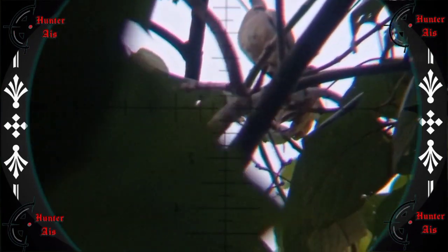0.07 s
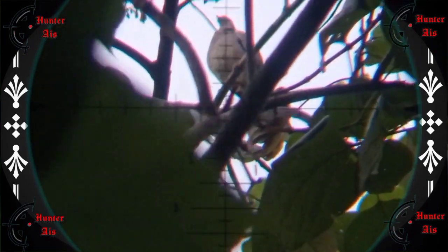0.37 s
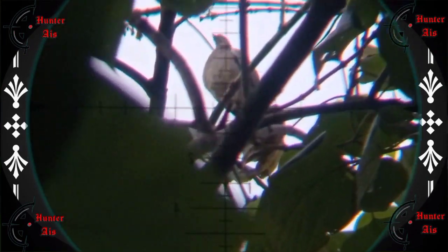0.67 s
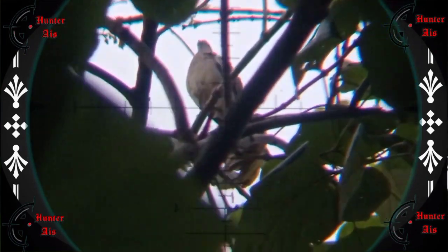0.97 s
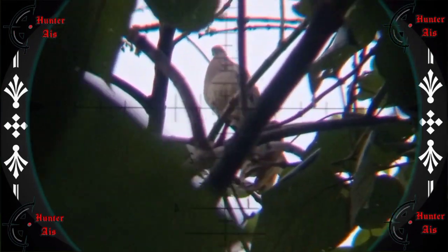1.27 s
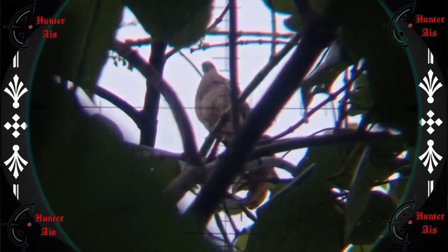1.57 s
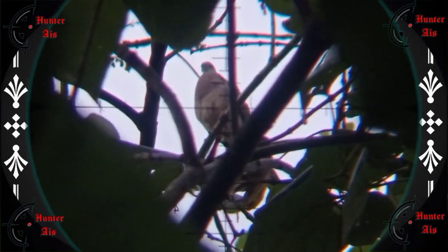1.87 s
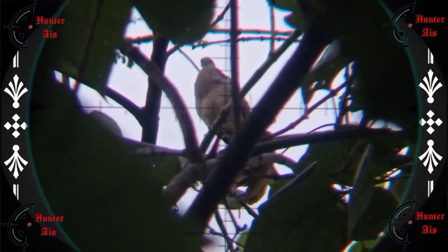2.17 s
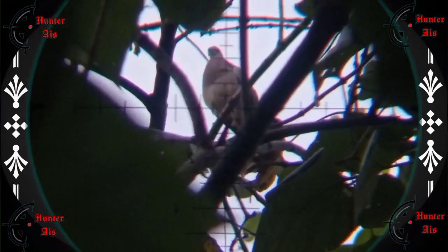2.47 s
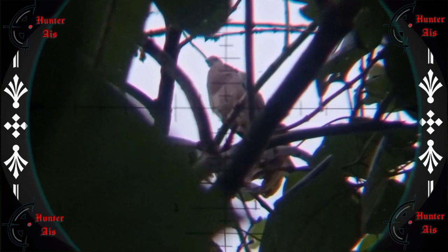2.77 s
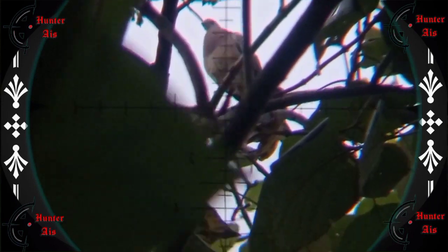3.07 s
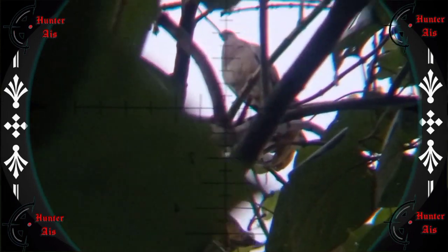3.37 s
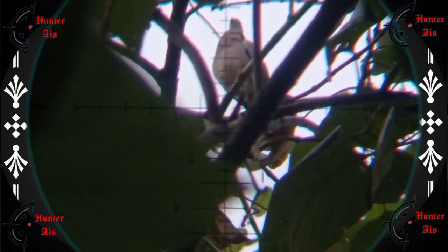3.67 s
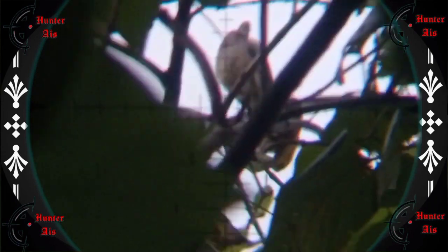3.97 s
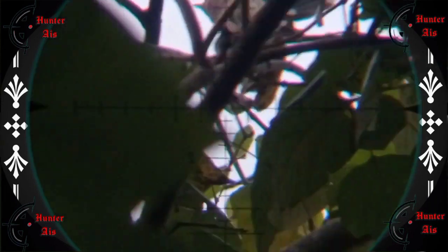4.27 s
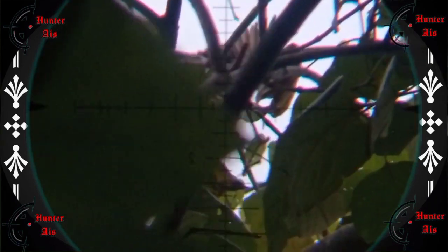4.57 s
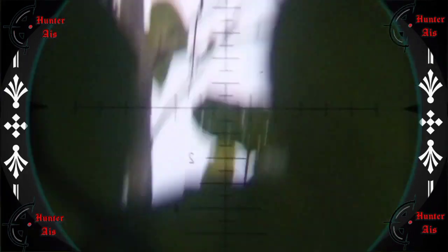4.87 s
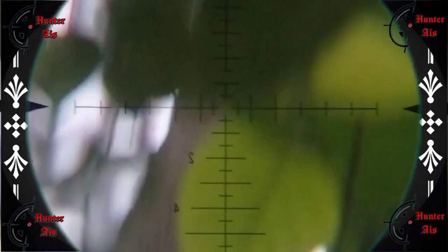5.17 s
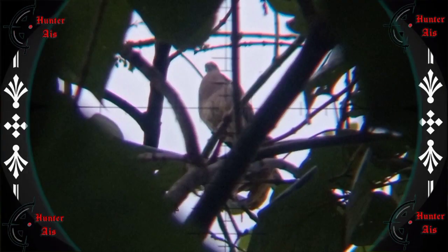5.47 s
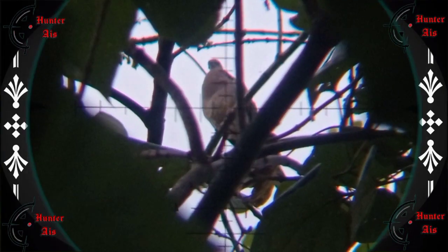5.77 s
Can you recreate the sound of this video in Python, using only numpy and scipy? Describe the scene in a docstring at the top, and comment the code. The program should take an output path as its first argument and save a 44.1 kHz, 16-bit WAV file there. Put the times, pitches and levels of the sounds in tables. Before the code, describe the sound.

Insects buzz steadily among trees while distant birds whistle and coo over a soft low rumble. About four seconds in, a trigger ticks and an air rifle fires once close to the microphone, its spring ringing briefly. The pellet hits distant wood with a short echo. The rifle clicks and rubs as it is handled, then a brief hiss swells, the sound drops out, and the insects and birds creep back.

```python
"""An air rifle is fired once under trees, close by, amid steady insects and far birds.
The trigger ticks, the piston slams home, the spring rings, and the pellet hits far wood with an echo.
Then the rifle clicks and rubs as it is handled. Insects scrape thin tones and buzzes, birds whistle
and coo, and soft air, a rumble and a faint hum lie underneath.
Near the end a rush of hiss swells, everything fades out, and the chorus creeps back."""
import sys
import numpy as np
from scipy import signal
from scipy.fft import rfft, irfft, next_fast_len
from scipy.io import wavfile

SR = 44100
rng = np.random.default_rng(int(sys.argv[2]) if len(sys.argv) > 2 else 0)


def int16_out(signal):
    """Quantize to a 16-bit WAV file."""
    q = np.round(np.clip(np.atleast_2d(signal).T, -1, 1) * 32767)
    wavfile.write(sys.argv[1], SR, q.astype(np.int16))


N = 264644
TIME = np.arange(N) / SR


def from_db(db):
    """Turn decibels into a number to multiply by."""
    return 10 ** (np.asarray(db) / 20)

def unit_power(x):
    """Scale a sound to an average power of one."""
    return x / np.sqrt(np.mean(x ** 2) + 1e-20)

def gain_at(colour, hz):
    """Look up how strong a pitch is in a table of (pitch [Hz], level [dB])."""
    points = np.array(colour)
    return from_db(np.interp(np.log(hz + 1), np.log(points[:, 0]), points[:, 1]))

def noise(shape):
    """Noise in which shape(hz) says how strong each pitch is."""
    size = next_fast_len(N)
    hz = np.arange(size // 2 + 1) * SR / size
    return unit_power(irfft(rfft(rng.standard_normal(size)) * shape(hz), size)[:N])

def hiss(colour):
    """Noise whose colour, its mix of low and high, comes from a table."""
    return noise(lambda hz: gain_at(colour, hz))

def murmur(pitch_hz, width_hz):
    """Noise gathered around one pitch."""
    return noise(lambda hz: (1 + ((hz - pitch_hz) / width_hz) ** 2) ** -2)

def drift(rate_hz, size=N):
    """A random wander, about one up or down."""
    knots = rng.standard_normal(8192)
    return unit_power(np.interp(TIME[:size] * 2 * rate_hz, np.arange(len(knots)), knots))

def ramp(start, length):
    """Zero until the start, then a straight climb to one."""
    return np.clip((TIME - start) / length, 0, 1)

def bump(middle, width):
    """A smooth swell of height one."""
    return np.exp(-np.minimum(((TIME - middle) / width) ** 2, 20))

def dying(start, t60, rise=0.00047):
    """A quick rise, then a fade. t60 is the fade time: the seconds it takes to drop 60 dB."""
    age = np.maximum(TIME - start, 0)
    return (1 - np.exp(-age / rise)) * np.exp(-np.minimum(np.log(1000) * age / t60, 40))

def strike(hits, tones):
    """Hits (time [s], level [dB]) ring an object's tones (pitch [Hz], level [dB], fade time [s])."""
    blows, ringing = np.full(N, 1e-18), np.zeros(N)
    for s, db in hits:
        blows[round(s * SR)] += from_db(db)
    for k, (hz, db, t60) in enumerate(tones):
        decay = np.exp(-np.log(1000) / (t60 * SR))
        angle = 2 * np.pi * hz / SR
        tone = signal.lfilter([0, np.sin(angle)], [1, -2 * decay * np.cos(angle), decay ** 2], blows)
        ringing += (-1) ** k * from_db(db) * tone
    return ringing

def dull(x, cutoff_hz):
    """Soften the treble above the cutoff."""
    return signal.sosfilt(signal.butter(2, cutoff_hz, fs=SR, output="sos"), x)

def trees(x, t60, tail_db):
    """Trunks and leaves scatter a sound, giving it a soft tail."""
    tail = (rng.standard_normal(N) * dying(0.0011, t60, rise=0.005))[:SR]
    return x + from_db(tail_db) * signal.fftconvolve(x, tail / np.linalg.norm(tail))[:N]


# the far background noise: (pitch [Hz], level [dB])
AIR_COLOUR = [(20, -38.5), (50, -22.5), (90, -5.5), (150, -2.5), (260, -17), (600, -18.5), (1000, -24.5),
              (2400, -32), (3600, -32.5), (3900, -43), (7300, -40.5), (8500, -47.5), (13000, -50.5),
              (14400, -35), (15450, -36.5), (15650, -65.5)]

def background(air_db=-68.5, rumble_db=-69.5, throb_db=3.5):
    """Soft, wavering air and a distant rumble that throbs unevenly."""
    air = from_db(air_db + drift(6.4)) * hiss(AIR_COLOUR)
    rumble = from_db(rumble_db + throb_db * drift(8)) * murmur(pitch_hz=139.5, width_hz=55)
    return air + rumble


def insect_buzz(pitch_hz, width_hz, pulse_hz, depth, waver_db=0.46):
    """Insects sing around one pitch, out of step; the nearest make the sound pulse."""
    phase = 2 * np.pi * np.cumsum(pulse_hz * (1 + 0.09 * drift(8.1))) / SR
    song = murmur(pitch_hz, width_hz) * (1 + depth * np.sin(phase))
    return unit_power(song) * from_db(waver_db * drift(4.1))

# groups of insects: (pitch [Hz], width [Hz], level [dB], pulse rate [Hz], pulse depth [0-1])
INSECT_GROUPS = [(3540, 170, -83.5, 62, .2), (4673, 370, -76.5, 170, 0.4), (6188, 370, -65.5, 250, .3),
                 (6449, 300, -64, 250, 0), (6860, 73, -78.5, 140, 0.05), (13640, 300, -88, 210, 0.4)]

def insect_chorus():
    """Several groups of insects buzz without a break."""
    return sum(from_db(db) * insect_buzz(hz, width, rate, depth)
               for hz, width, db, rate, depth in INSECT_GROUPS)


# a cricket's overtones, the tones above its main one: (pitch [Hz], level against the main tone [dB])
WING_OVERTONES = [(10200, -28), (13250, -19.5), (13700, -6.5), (14100, -3.5), (14700, -19.5)]

def cricket(pitch_hz, sway_s, highest_s, sway_hz=29.6, pulse_hz=45, depth=0.46, swell_db=3):
    """A scraped wing makes a thin, pulsing note; its pitch sways and each tone swells and sinks."""
    sway = sway_hz * np.cos(2 * np.pi * (TIME - highest_s) / sway_s)
    hz = pitch_hz * (1 + 0.0022 * drift(9)) + sway
    pulses = 1 + depth * np.sin(2 * np.pi * np.cumsum(pulse_hz * (1 + 0.15 * drift(9.2))) / SR)
    phase = 2 * np.pi * np.cumsum(hz) / SR
    tone = lambda k: unit_power(np.sin(k * phase) * pulses * from_db(swell_db * drift(5)))
    return tone(1) + sum(gain_at(WING_OVERTONES, k * pitch_hz) * tone(k) for k in (2, 3, 4))

# crickets: (pitch [Hz], level [dB], time per sway [s], time of highest pitch [s], share of surge [0-1])
NEAR_CRICKETS = [(3433, -80.5, 2.3, 1.3, 1), (3436, -82.5, 2.05, .92, .2), (3366, -82, 2.35, 1.0, 0.2),
                 (3340, -86, 2.45, 0.8, 0.03), (3330, -91, 3.5, 1.2, .1), (3715, -89.5, 2.15, 0.8, 0.78)]
# moments when they get louder: (time [s], width [s], boost [dB])
CRICKET_SURGES = [(3.38, 0.04, 8.5), (3.729, .1, 5)]

def crickets():
    """The nearest crickets trill among the trees and surge twice."""
    surge_db = sum(db * bump(s, width) for s, width, db in CRICKET_SURGES)
    trills = sum(from_db(db + share * surge_db) * cricket(hz, sway_s, highest_s)
                 for hz, db, sway_s, highest_s, share in NEAR_CRICKETS)
    return trees(trills, t60=0.36, tail_db=-1)


def bird_note(start, length, pitch, hoarse):
    """A whistle following pitch(progress), with progress 0-1; a hoarse one flutters, then clears."""
    progress = np.linspace(0, 1, round(length * SR))
    flutter = 0.15 * hoarse * np.cos(np.pi / 2 * progress) ** 2 * drift(160, size=len(progress))
    hz = pitch(progress) * (1 + flutter)
    swell = np.sqrt(np.abs(np.sin(np.pi * progress)))
    wave = swell * np.sin(2 * np.pi * np.cumsum(hz) / SR)
    return np.pad(wave, (round(start * SR), N))[:N]

# very distant birds: (pitch [Hz], level [dB])
FAR_WHISTLES = [(1800, -85), (2620, -89)]

def far_birds(count=40, vary_db=3, slide=0.046):
    """Short, slightly falling whistles come at random, blurred by the trees."""
    whistles = np.zeros(N)
    for hz, db in FAR_WHISTLES:
        for k, (delay, detune, strength) in enumerate(rng.uniform(-1, 1, (count, 3))):
            start = (k + abs(delay)) / count * N / SR
            fall = lambda progress: hz * (1 + slide * (detune + 0.5 - progress))
            whistles += from_db(db + vary_db * strength) * bird_note(start, 0.13, fall, hoarse=0.2)
    return trees(whistles, t60=0.47, tail_db=2)


def chirping_insect(first_s=0.437, every_s=0.2475, chirp_db=-69, buzz_db=-75.5):
    """A nearer insect chirps six times at an even pace, and later buzzes in one long swell."""
    chirps = sum(bump(first_s + k * every_s, width=0.086) for k in range(6))
    loudness = from_db(chirp_db) * chirps + from_db(buzz_db) * bump(middle=3.55, width=0.4)
    return loudness * insect_buzz(pitch_hz=4490, width_hz=250, pulse_hz=200, depth=0.45)


# high bird calls: (time [s], length [s], level [dB], hoarseness [0-1], first pitch [Hz], last pitch [Hz])
HIGH_CALLS = [(0.829, 0.08, -71, 0.21, 1858, 1714), (1.234, 0.051, -70.5, 0.87, 2600, 1654),
              (1.561, 0.065, -66.5, 0.45, 2740, 1694), (2.25, 0.15, -73.5, 0.08, 3045, 3206),
              (2.956, .17, -80, 0.4, 2780, 2506), (3.543, 0.16, -80.5, 0.54, 2760, 3110)]

def calling_birds(curve=1.7):
    """Thin calls, each sliding in pitch and then flattening out."""
    calls = np.zeros(N)
    for start, length, db, hoarse, from_hz, to_hz in HIGH_CALLS:
        glide = lambda progress: to_hz + (from_hz - to_hz) * (1 - progress) ** curve
        calls += from_db(db) * bird_note(start, length, glide, hoarse)
    return trees(calls, t60=0.47, tail_db=2)


# low bird calls: (time [s], length [s], level [dB], pitch aimed for [Hz], hoarseness [0-1])
LOW_COOS = [(1.225, 0.06, -64.5, 685, 0.05), (1.493, 0.25, -56.5, 783, 0.23),
            (1.9, 0.4, -57.5, 738.6, 0.64), (2.763, 0.16, -57.5, 702.6, 0.24),
            (5.468, .24, -63.5, 729.6, 0.35), (5.601, 0.32, -62.5, 820, .45), (5.831, 0.37, -57, 754, 0.36)]

def cooing_birds(scoop=0.284, scoop_s=0.04, sag=0.28, swell_db=2):
    """Each coo scoops up in pitch, is loudest past its middle, and sags at the end."""
    coos = np.zeros(N)
    for start, length, db, hz, hoarse in LOW_COOS:
        def arch(progress):
            return hz * (1 - scoop * np.exp(-progress * length / scoop_s) - sag * progress ** 2.6)
        swell = bump(start + 0.78 * length, 0.14 * length)
        coos += from_db(db + swell_db * swell) * bird_note(start, length, arch, hoarse)
    return trees(coos, t60=0.52, tail_db=-2.5)


def distant_hum(level_db=-69):
    """A faint low hum swells far away and slowly dies."""
    return from_db(level_db) * dying(2.88, t60=5.2, rise=0.021) * murmur(pitch_hz=249.4, width_hz=30)


# tones of the rifle's small steel parts: (pitch [Hz], level [dB], fade time [s])
STEEL_TONES = [(877, -15.5, 0.016), (1320, -5, 0.01), (1700, -2.5, 0.019), (2908, 0, 0.0087),
               (4470, -7.5, 0.0056), (9500, -25, .002)]
# clicks of the trigger and other moving parts: (time [s], level [dB], treble cutoff [Hz])
STEEL_CLICKS = [(3.9940, -35.5, 2960), (4.0014, -37, 2470), (4.156, -35, 6000), (4.8018, -49, 1990),
                (4.8240, -36.5, 12000), (4.8253, -25, 3300), (4.8637, -31, 2600), (4.9376, -53.5, 5080),
                (4.992, -55, 4000)]

def clicks():
    """Steel parts snap into place and ring; a softer touch sounds duller."""
    ticks = sum(dull(strike([(s, db)], STEEL_TONES), cutoff) for s, db, cutoff in STEEL_CLICKS)
    return trees(ticks, t60=0.18, tail_db=-19.5)


# the trigger catch slips twice, lower the second time: (time [s], level [dB], pitch [Hz], fade time [s])
TRIGGER_SLIPS = [(3.9957, -32.5, 1913, .012), (3.9981, -40, 1290, 0.03)]
# knocks of the stock, the part you hold: (time [s], level [dB], pitch [Hz], fade time [s])
STOCK_KNOCKS = [(4.0297, -28, 90.45, 0.038), (4.0347, -36, 170, .02), (4.0542, -32.5, 198, 0.03),
                (4.096, -43, 250, .025), (4.1382, -25.5, 430, 0.015), (4.1566, -30, 407, 0.021),
                (4.1693, -31, 440, 0.014), (4.223, -45, 242, 0.066), (4.8673, -43.5, 480, 0.024),
                (5.134, -45, 860, 0.041)]

def slips_and_knocks():
    """Each small bump of the trigger or stock rings one short, dull tone."""
    taps = sum(strike([(s, db)], [(hz, 0, t60)]) for s, db, hz, t60 in TRIGGER_SLIPS + STOCK_KNOCKS)
    return dull(taps, cutoff_hz=4000)


# bursts of air and rattling metal: (time [s], level [dB], fade time [s])
BURSTS = [(4.0255, -17, 0.017), (4.0345, -16.5, .022), (4.0450, -26.5, 0.039)]
# the noise in those bursts: (pitch [Hz], level [dB])
BURST_COLOUR = [(60, -4), (400, 0), (1000, -11.5), (2000, -0.5), (3300, -7), (4200, -0.5), (5000, -6),
                (6300, 3), (7500, -6.5), (10000, -21), (13800, -21), (15000, -4.5), (16500, -21.5)]
# the piston, which pushes the air, hits home and bounces: (time [s], level [dB])
PISTON_HITS = [(4.0269, -9), (4.0276, 0.5), (4.0290, -10), (4.0356, -23)]
# tones of the barrel and stock: (pitch [Hz], level [dB], fade time [s])
BODY_TONES = [(115.1, -26.5, 0.017), (245, -18.5, 0.021), (363, -16.5, 0.018), (622, -8, 0.014),
              (1300, -7.5, 0.0078), (1620, -12, .01), (2130, -6, 0.0079), (2840, -8, .009),
              (4100, -13, 0.0054), (5300, -17, 0.017), (6260, -12.5, 0.0092)]

def shot():
    """Air bursts out and metal clatters as the piston's slam rings the whole rifle."""
    clatter = hiss(BURST_COLOUR) * sum(from_db(db) * dying(s, t60) for s, db, t60 in BURSTS)
    return clatter + strike(PISTON_HITS, BODY_TONES)


# the ringing of the spring's coils: (pitch [Hz], level [dB])
COIL_COLOUR = [(100, -5), (300, -5), (600, -8.5), (1130, -7.5), (1900, -7), (3100, -5.5), (3860, -14.5),
               (4600, -7.5), (6300, -0.5), (8000, -12), (8500, -11), (9100, -17.5), (11200, -24),
               (11900, -18.5), (12600, -28.5), (15000, -13), (16000, -31)]

def coil_shimmer(level_db=-40.5, scatter_db=-39, count=100):
    """The coils ring in many weak tones, the high ones dying sooner; sound scatters nearby as a hiss."""
    hz = np.linspace(1500, 15400, count) + rng.uniform(-70, 70, count)
    weights = gain_at(COIL_COLOUR, hz)
    age = TIME[:SR, None]
    t60 = 0.58 / (1 + hz / 18000)
    waves = np.sin(2 * np.pi * (hz * age + rng.random(count))) * np.exp(-np.log(1000) * age / t60)
    ring = waves @ (weights / np.linalg.norm(weights))
    first_hit_s, hardest_hit_s = PISTON_HITS[0][0], PISTON_HITS[1][0]
    ring = np.pad(ring, (round(hardest_hit_s * SR), N))[:N]
    scatter = hiss(COIL_COLOUR) * dying(first_hit_s, t60=0.79, rise=0.0079)
    return from_db(level_db) * ring + from_db(scatter_db) * scatter

# the spring's strongest tones: (pitch [Hz], level [dB], fade time [s])
SPRING_TONES = [(4400, -5, 0.78), (4930, -3, 0.91), (4920, -2.5, 0.46), (5530, -4, 0.52),
                (5669, -4.5, 0.46), (6450, 3, 0.85), (6900, -6.5, .55), (7150, -7, .55), (8450, -7.5, 0.45),
                (10070, -10, 0.43), (14900, -5.5, .4)]

def spring(level_db=-50, neighbour_db=-5):
    """The slam rings the spring; each tone wobbles against a weaker neighbour on either side."""
    tones = [(hz + side * rng.uniform(14.44, 110.2), db + abs(side) * neighbour_db, t60)
             for hz, db, t60 in SPRING_TONES for side in (0, -1, 1)]
    return strike([(PISTON_HITS[0][0], level_db)], tones)


# tones of the wood that the pellet hits: (pitch [Hz], level [dB], fade time [s])
WOOD_TONES = [(710, -2, 0.028), (1570, -2.5, .04), (1890, 1, .04)]
# the echo from the trees: (pitch [Hz], level [dB])
TREE_ECHO_COLOUR = [(100, -57), (500, 6.5), (1000, 4.5), (1800, 10.5), (2800, 10), (4000, -1), (6800, -4),
                    (11000, -52)]

def pellet(lands_s=4.2775, tick_db=-42, echo_db=-48, flicker_db=1.26):
    """The pellet ticks on far wood, and the trees answer with a patchy echo."""
    tick = strike([(lands_s, tick_db)], WOOD_TONES)
    echo = hiss(TREE_ECHO_COLOUR) * dying(lands_s, t60=0.71, rise=0.00085)
    return tick + echo * from_db(echo_db + flicker_db * drift(40))


# hands rubbing the stock: (pitch [Hz], level [dB])
RUB_COLOUR = [(80, -28), (260, 0.5), (550, -7), (1000, -15.5), (3200, -20), (7500, -30), (10200, -36.5),
              (12500, -46)]

def hands(start_s=4.77, end_s=5.28, level_db=-61.5, settle_db_per_s=15, rough_db=4.5):
    """Hands shift on the stock with an uneven rub, then settle."""
    settling = from_db(level_db - settle_db_per_s * (TIME - start_s))
    rub = unit_power(hiss(RUB_COLOUR) * from_db(rough_db * drift(25)))
    return ramp(start_s, 0.049) * settling * (TIME < end_s) * rub


SILENT_S = 5.405   # when the whole scene has faded to nothing
# the closing rush of hiss: (pitch [Hz], level [dB])
RUSH_HISS = [(50, -17.5), (130, -5), (400, 1.5), (900, -8), (2200, -6), (4000, -10.5), (6500, -7),
             (9000, -16.5), (13000, -24), (15200, -13), (15800, -50)]

def rush(start_s=5.18, level_db=-56):
    """A hiss swells and holds until the moment of silence."""
    return from_db(level_db) * ramp(start_s, 0.058) * (TIME < SILENT_S) * hiss(RUSH_HISS)


def scene():
    """Add every sound into one channel."""
    outdoors = background() + insect_chorus() + crickets() + far_birds() + chirping_insect()
    outdoors += calling_birds() + cooing_birds() + distant_hum()
    rifle = clicks() + slips_and_knocks() + shot() + coil_shimmer() + spring() + pellet() + hands()
    return (outdoors + rifle + rush())[None]

def record(dry, ceiling=0.78, dip_db=-7.5, fade_out_s=0.11, fade_in_s=0.98, cutoff_hz=16600):
    """Round off the loudest peaks, fade out fast and back in slowly, and cut the highest treble."""
    rounded = ceiling * np.tanh(dry / ceiling)
    dip = from_db(dip_db * bump(middle=4.016, width=0.0088))   # a brief dip just before the shot
    fade_out = (1 - ramp(SILENT_S - fade_out_s, fade_out_s)) ** 2.1
    fade_in = ramp(SILENT_S, fade_in_s) ** 1.12
    treble_cut = signal.ellip(12, 0.1, 80, cutoff_hz, fs=SR, output="sos")
    return signal.sosfilt(treble_cut, rounded * dip * (fade_out + fade_in))


dry = scene()
out = record(dry)
int16_out(out)
```